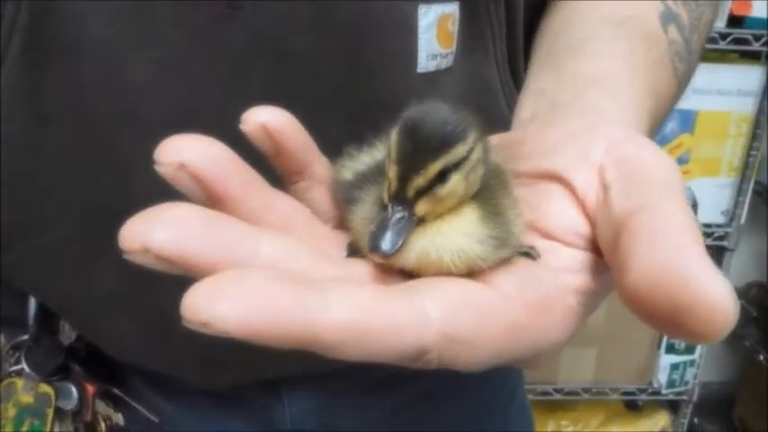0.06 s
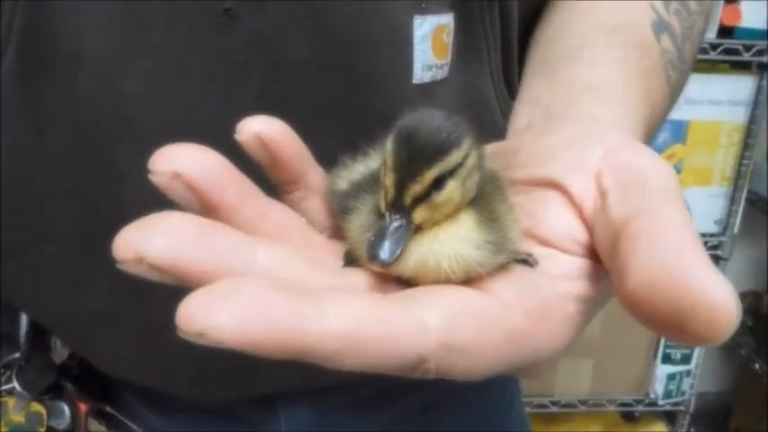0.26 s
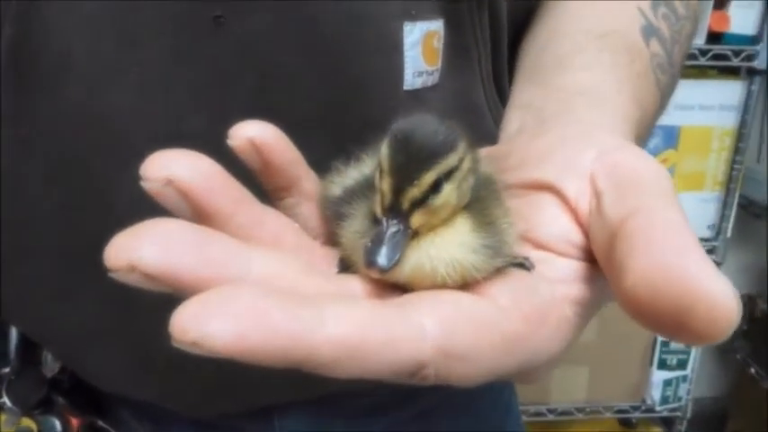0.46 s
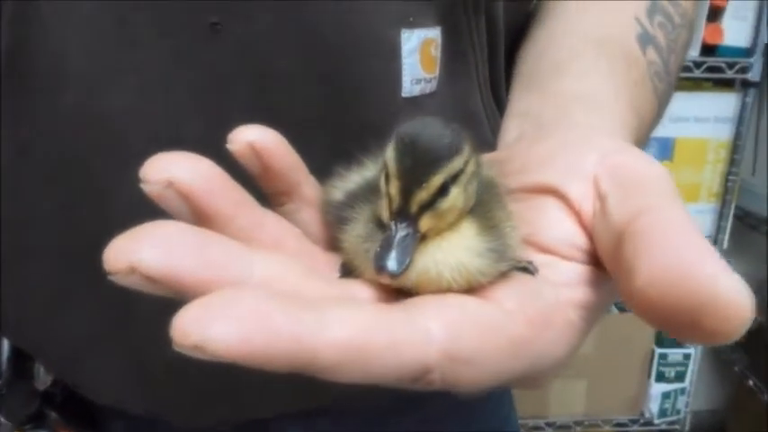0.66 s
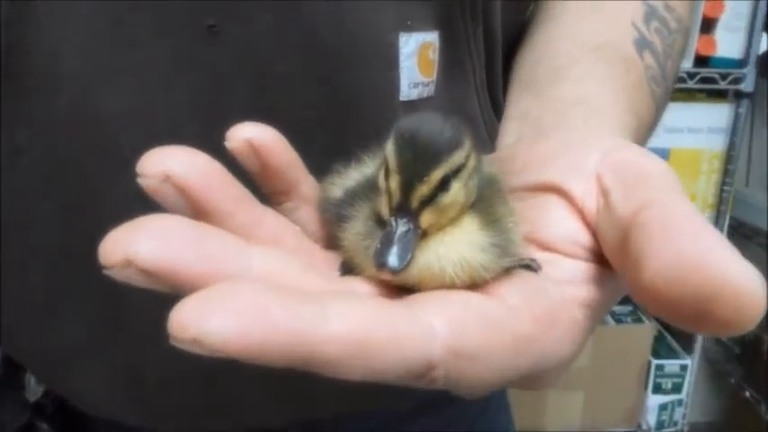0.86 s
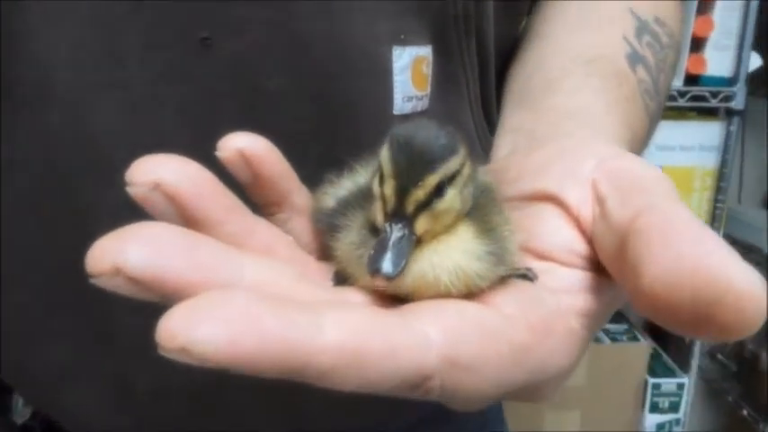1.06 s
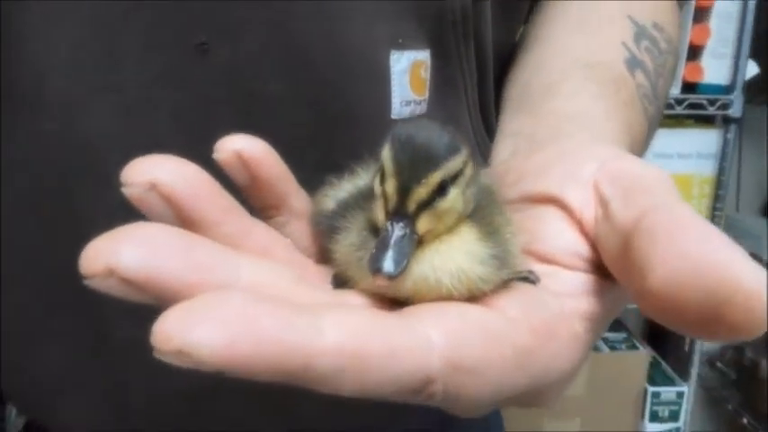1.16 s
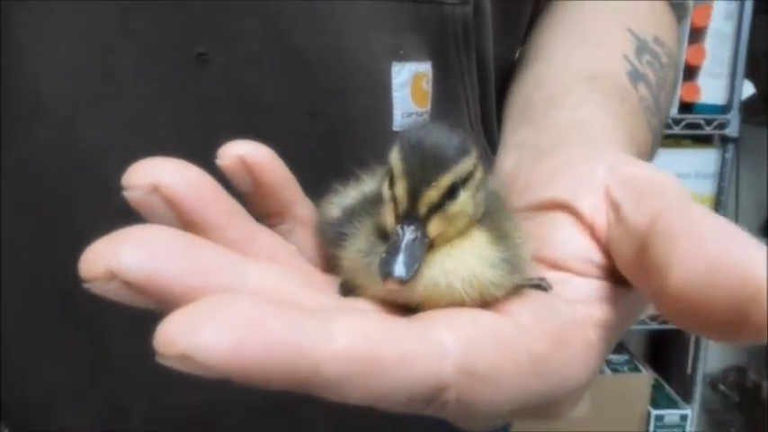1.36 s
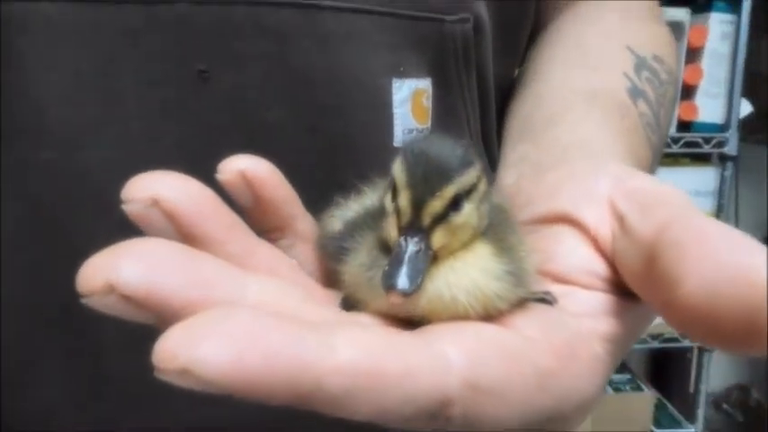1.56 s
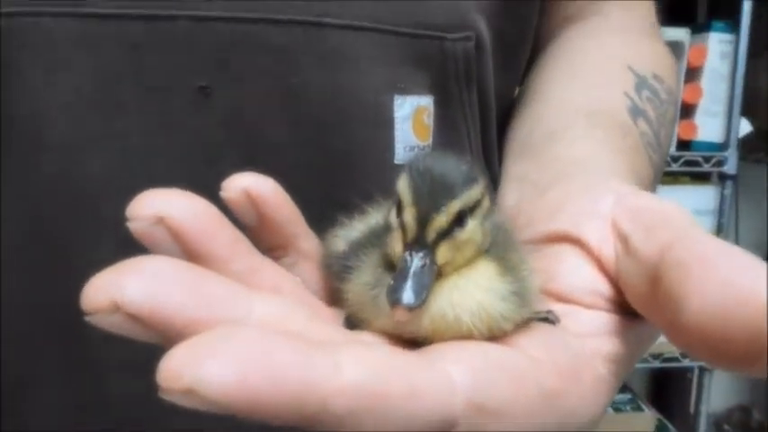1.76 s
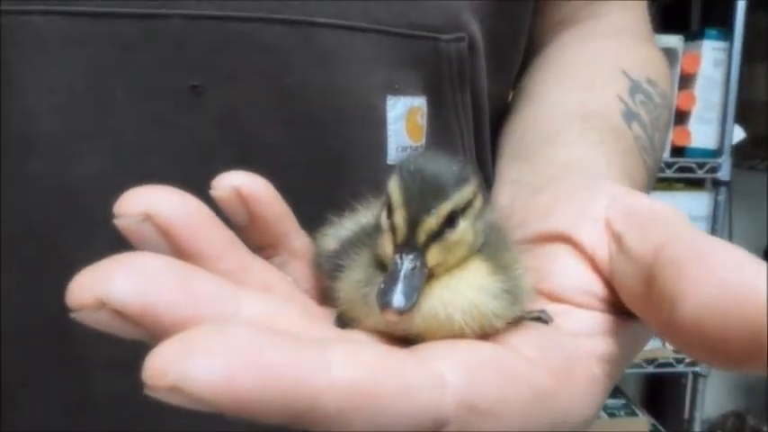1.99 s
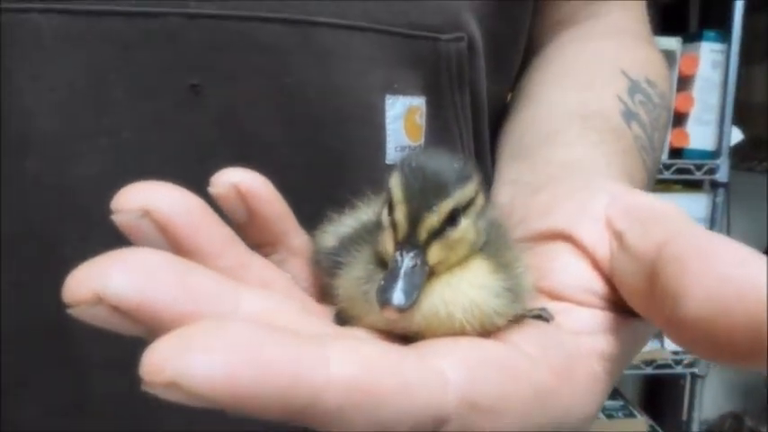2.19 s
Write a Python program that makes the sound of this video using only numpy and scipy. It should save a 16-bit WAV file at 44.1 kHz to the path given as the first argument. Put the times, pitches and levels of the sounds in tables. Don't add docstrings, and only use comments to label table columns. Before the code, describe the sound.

Two thin, arched duckling peeps frame a quieter quick trill, each with a little airy hiss. Early cloth rustle and tiny handling buzzes sit near the microphone, with a humming small room behind.

```python
import sys
import numpy as np
from scipy import signal
from scipy.fft import rfft, irfft
from scipy.io import wavfile
from scipy.ndimage import uniform_filter1d

SR = 44100
rng = np.random.default_rng(int(sys.argv[2]) if len(sys.argv) > 2 else 0)


def log_audio(samples):
    frames = np.atleast_2d(samples).T
    limited = np.clip(frames, -1, 1)
    pcm = np.round(limited * 32767).astype(np.int16)
    wavfile.write(sys.argv[1], SR, pcm)


def natural_amplitude(level_db):
    exponent = np.asarray(level_db, float) / 20
    return 10 ** exponent


N = 98431


def evened(x):
    return x / np.sqrt(np.mean(x ** 2) + 1e-20)


def read_curve(points, hz):
    f, value = np.transpose(points)
    return np.interp(np.log(hz + 1), np.log(f + 1), value)


def drift(hz):
    spectrum = rfft(rng.standard_normal(N))
    lowpass = 1 + (np.fft.rfftfreq(N, 1 / SR) / hz) ** 4
    return evened(irfft(spectrum / lowpass, N))


def swell(start, length, roundness):
    place = np.clip((np.arange(N) / SR - start) / length, 0, 1)
    return place, np.abs(np.sin(np.pi * place)) ** roundness * (place < 1)


def stereo_hiss(gain, likeness):
    left, other = rfft(rng.standard_normal((2, N)), axis=1)
    likeness = np.clip(likeness, -1, 1)
    right = likeness * left + np.sqrt(1 - likeness ** 2) * other
    return irfft(np.array([left, right]) * gain, N, axis=1)


def ventilation():
    # f/Hz, level/dB per Hz
    air_colour = [(20, -4), (62, -8.5), (100, -13), (200, -13.5), (450, -18.5), (2000, -22.5), (7000, -33),
                  (16000, -34)]
    # f/Hz, likeness (-1 to 1)
    channel_likeness = [(30, 0.9), (120, 0.7), (300, 0.47), (700, 0.33), (1500, -0.042), (4000, -0.043),
                        (8000, -0.085), (14000, -.02)]
    hz = np.fft.rfftfreq(N, 1 / SR)
    gain = natural_amplitude(read_curve(air_colour, hz)) * hz / (hz + 20)
    gain = gain / np.sqrt(np.mean(gain ** 2 * (hz > 400)))
    return stereo_hiss(gain, read_curve(channel_likeness, hz)) * natural_amplitude(-51.5 + 0.68 * drift(12))


def mains_hum():
    # f/Hz, level/dB, waver/dB, growth/dB per s
    hum_lines = [(120, -67.5, 3., 2.), (240, -58, 1., .1), (360, -61.5, 1., .1)]
    t, hum = np.arange(N) / SR, 0
    for f, db, waver_db, growth_db in hum_lines:
        level = natural_amplitude(db + waver_db * drift(1.95) + growth_db * t)
        phase = 2 * np.pi * (f * t + rng.random()) + 0.83 * drift(10)
        hum = hum + np.sqrt(2) * level * np.sin(phase)
    return hum


def motor_throb():
    # t/s, level/dB
    throb_level = [(0.0, -47), (0.06, -45.5), (0.94, -54.5), (1.35, -50.5), (1.42, -51.5), (1.68, -50.5),
                   (1.79, -45.5), (2.23, -53.5)]
    throb_hz, width_hz, blur_db = 30, 8, -13
    t, hz = np.arange(N) / SR, np.fft.rfftfreq(N, 1 / SR)
    band = 1 / (1 + ((hz - throb_hz) / width_hz) ** 4)
    blur = evened(stereo_hiss(band, 1)[0])
    tone = np.sqrt(2) * np.sin(2 * np.pi * throb_hz * t + 1.1 * drift(0.4))
    s, db = np.transpose(throb_level)
    return (tone + natural_amplitude(blur_db) * blur) * natural_amplitude(np.interp(t, s, db))


def store_room():
    return ventilation() + (mains_hum() + motor_throb()) * natural_amplitude([[-.3], [.3]])


def whistle(hz, level, overtones_db):
    jitter, fray_db, shimmer_db = .005, 4, .7
    phase = 2 * np.pi * np.cumsum(hz * (1 + jitter * drift(92))) / SR
    tone = np.sin(phase)
    for partial, db in enumerate(overtones_db, 2):
        tone = tone + natural_amplitude(db + fray_db * drift(300)) * np.sin(partial * phase)
    return np.sqrt(2) * tone * level * natural_amplitude(shimmer_db * drift(220))


def peep_calls():
    # t/s, f/Hz, level/dB
    peep_curves = [
        [(.066, 1790, -56), (.075, 2090, -35), (.085, 2350, -30.5), (.093, 2400, -30), (.101, 2475, -27.5),
         (.119, 2450, -28), (.124, 2330, -33), (.138, 2053, -37), (.147, 1930, -52)],
        [(1.723, 1720, -52), (1.731, 2180, -33), (1.744, 2460, -29), (1.765, 2400, -27), (1.779, 2230, -33.5),
         (1.79, 2170, -32), (1.797, 2075, -37.5), (1.804, 2030, -37), (1.821, 1830, -60)],
    ]
    t, out = np.arange(N) / SR, np.zeros(N)
    for curve in peep_curves:
        s, hz, db = np.transpose(curve)
        edges = np.clip(np.minimum(t - s[0], s[-1] - t) / 0.0013, 0, 1)
        level = uniform_filter1d(natural_amplitude(np.interp(t, s, db)) * edges, size=60)
        pitch = uniform_filter1d(np.interp(t, s, hz), size=130)
        out += whistle(pitch, level, (-37, -40))
    return out


def pip_calls():
    # start t/s, length/s, top f/Hz, level/dB, final fall/share of pitch
    pip_notes = [
        (.005, .11, 1760, -57, .01),
        (.03, .026, 1700, -50, .01),
        (.145, .029, 2040, -40, .11),
        (1.197, .046, 1935, -43, .11),
        (1.249, .032, 1975, -42.5, .11),
        (1.282, .03, 1920, -46, .2),
    ]
    rise = .11
    out = np.zeros(N)
    for start, length, top_hz, db, fall in pip_notes:
        place, envelope = swell(start, length, 1.8)
        bend = np.where(place < .5, rise, fall) * (2 * place - 1) ** 2
        out += whistle(top_hz * (1 - bend), natural_amplitude(db) * envelope, (-24, -38))
    return out


def duckling():
    return peep_calls() + pip_calls()


def walls(voice):
    level_db, t60 = -24, .12
    t = np.arange(SR // 4) / SR
    tail = rng.standard_normal((2, len(t))) * natural_amplitude(-60 * t / t60) * (t > .004)
    tail = tail / np.linalg.norm(tail[0])
    return natural_amplitude(level_db) * signal.fftconvolve(voice[None], tail, axes=1)[:, :N]


def cloth_rustle():
    # start t/s, length/s, centre f/Hz, level/dB
    rustles = [
        (.03, .33, 700, -56),
        (.55, .04, 750, -58.5),
    ]
    hz, out = np.fft.rfftfreq(N, 1 / SR), 0
    for start, length, centre_hz, db in rustles:
        detune = hz / centre_hz - centre_hz / (hz + 1)
        band = 1 / np.sqrt(1 + (2.24 * detune) ** 2)
        envelope = swell(start, length, 0.36)[1]
        out = out + natural_amplitude(db) * envelope * evened(stereo_hiss(band, 0.99)) * natural_amplitude(2 * drift(26))
    return out


def bill_air():
    # start t/s, length/s, level/dB, brightness/dB per octave, nasal ring/dB
    breath_puffs = [
        (0.058, 0.11, -52.5, -1, -1),
        (1.183, 0.14, -52.5, -2.5, 6.5),
        (1.716, .11, -48, -1.7, 1),
    ]
    # f/Hz, level/dB
    bill_colour = [(600, -13), (1700, -6), (2500, -1), (3100, -1), (4400, -5.5), (8500, -9), (9300, -22)]
    nasal_hz, nasal_width_hz = 3650, 350
    peak, wide = .35, 0.2
    hz, out = np.fft.rfftfreq(N, 1 / SR), 0
    for start, length, db, tilt_db, nasal_db in breath_puffs:
        ring_db = nasal_db * np.exp(-((hz - nasal_hz) / nasal_width_hz) ** 2)
        tilt = tilt_db * np.log2(hz / 3000 + 0.011)
        colour = natural_amplitude(read_curve(bill_colour, hz) + tilt + ring_db)
        warped = swell(start, length, 1)[0] ** (np.log(.5) / np.log(peak))
        puff = np.abs(np.sin(np.pi * warped)) ** .6 * (warped < 1)
        air = evened(stereo_hiss(colour, 1 - wide))
        out = out + natural_amplitude(db) * puff * air * natural_amplitude(1.2 * drift(120))
    return out


def camera_buffets():
    # start t/s, length/s, rate f/Hz, level/dB
    buffets = [
        (.183, .025, 212, -45),
        (.212, .02, 200, -50),
    ]
    t, out = np.arange(N) / SR, 0
    for start, length, rate_hz, db in buffets:
        phase = 2 * np.pi * rate_hz * (t - start)
        buzz = np.cos(phase) - 0.45 * np.cos(2 * phase)
        out = out + np.sqrt(2) * natural_amplitude(db) * swell(start, length, 0.42)[1] * buzz
    return out


def scene():
    pan_db = -2.5
    pan = natural_amplitude([[pan_db / 2], [-pan_db / 2]])
    room = store_room()
    voice = duckling()
    bird = (voice + bill_air()) * pan + walls(voice)
    return room + bird + cloth_rustle() + camera_buffets()


def band_limit(x):
    return signal.sosfilt(signal.butter(12, 16260, fs=SR, output="sos"), x)


def record(dry):
    treble_cut = signal.firwin(2047, 15730, window=("kaiser", 10), fs=SR)
    mix = signal.oaconvolve(dry, treble_cut[None], "same")
    return band_limit(mix)


dry = scene()
out = record(dry)
log_audio(out)
```